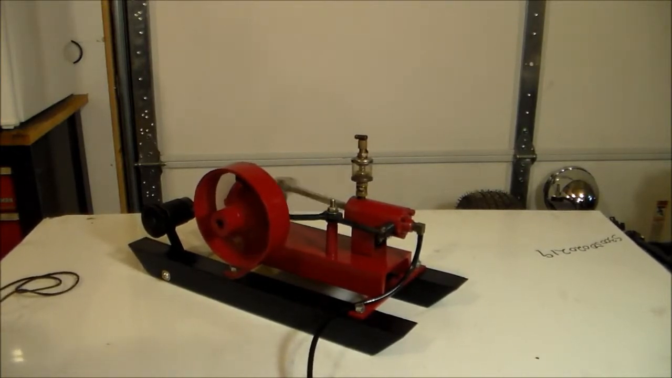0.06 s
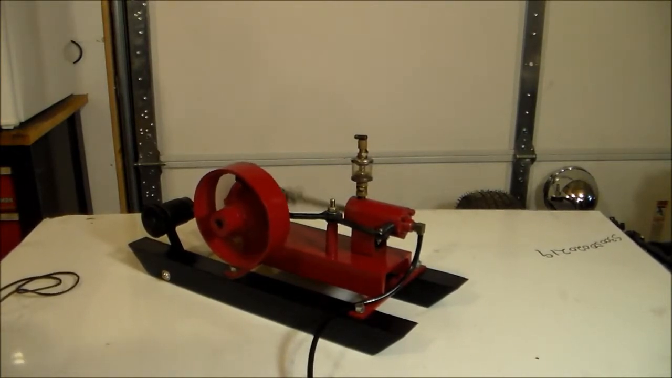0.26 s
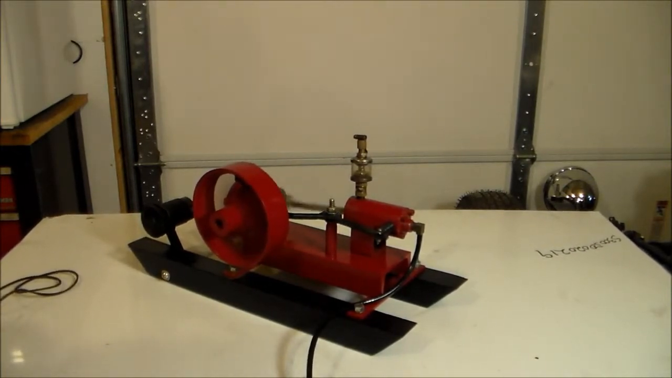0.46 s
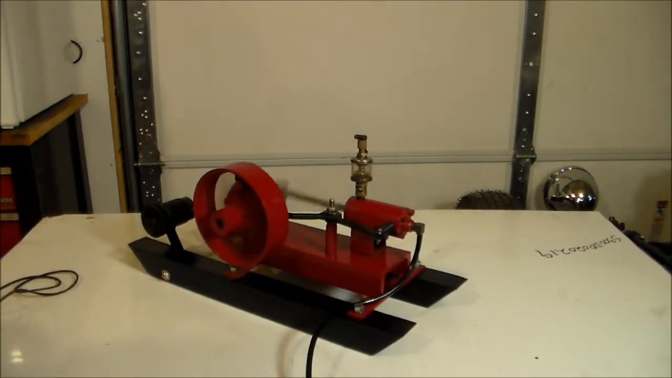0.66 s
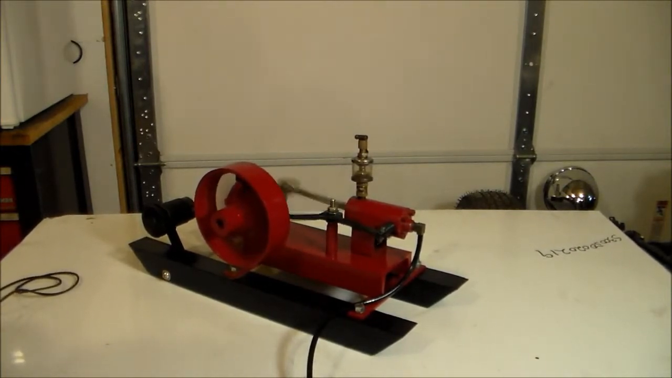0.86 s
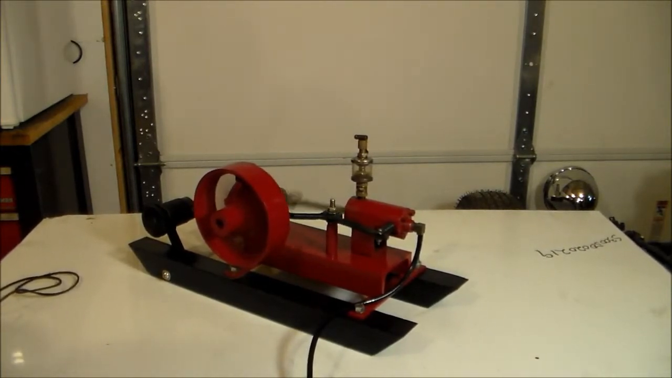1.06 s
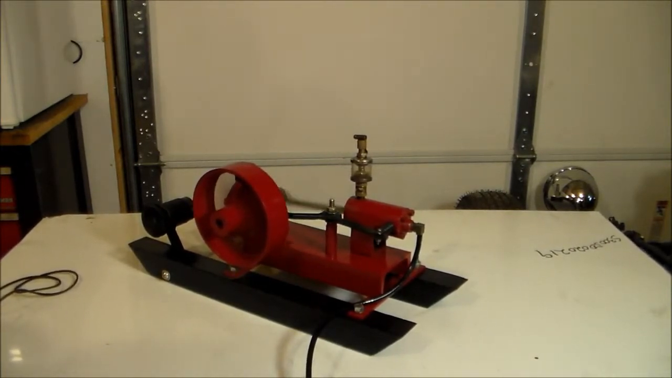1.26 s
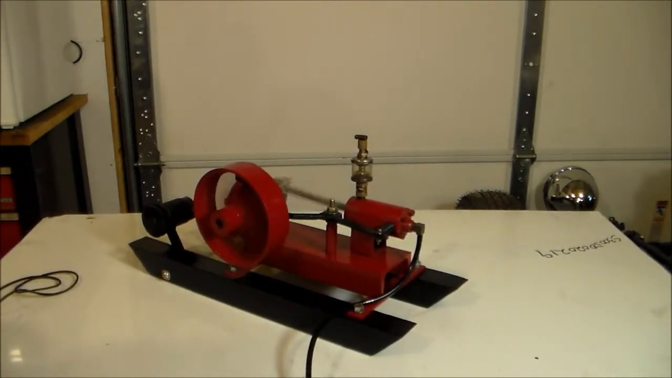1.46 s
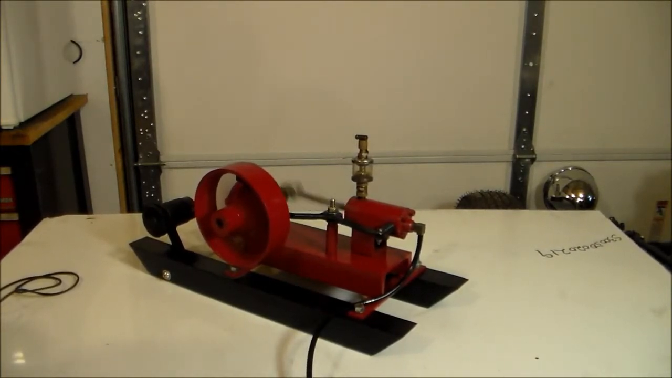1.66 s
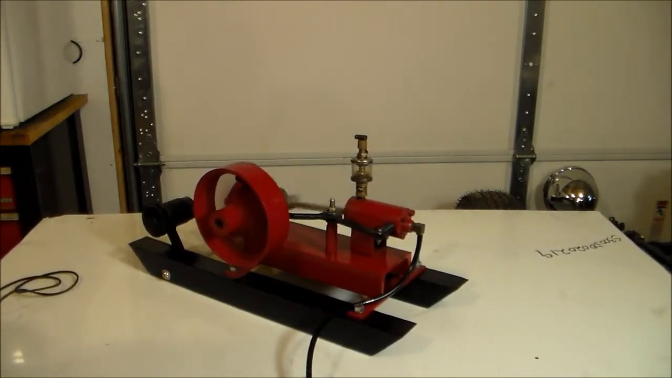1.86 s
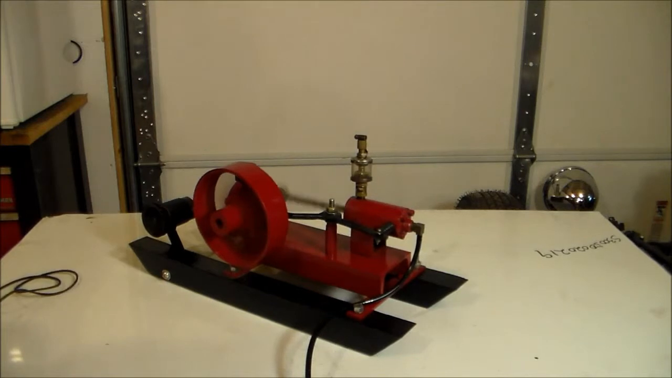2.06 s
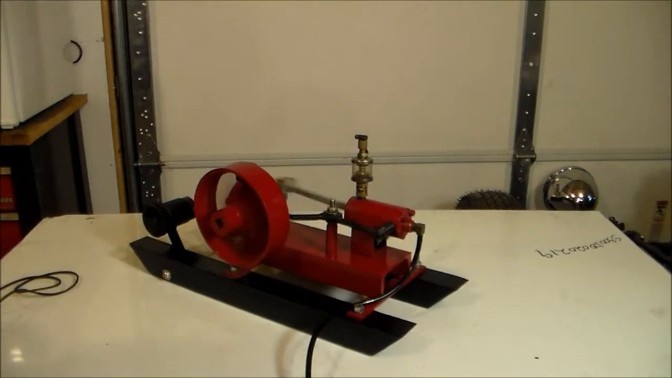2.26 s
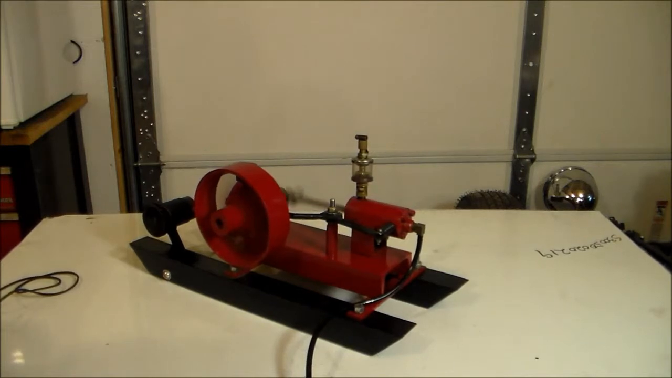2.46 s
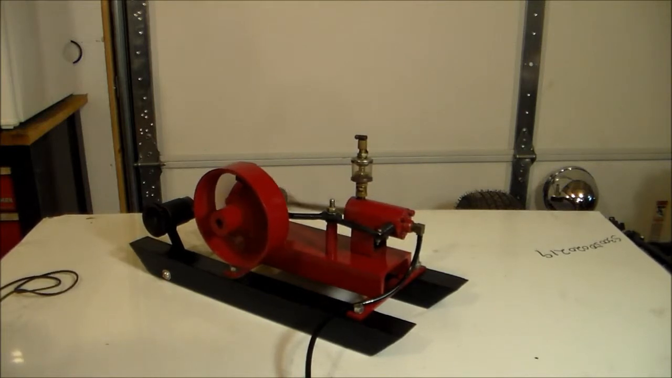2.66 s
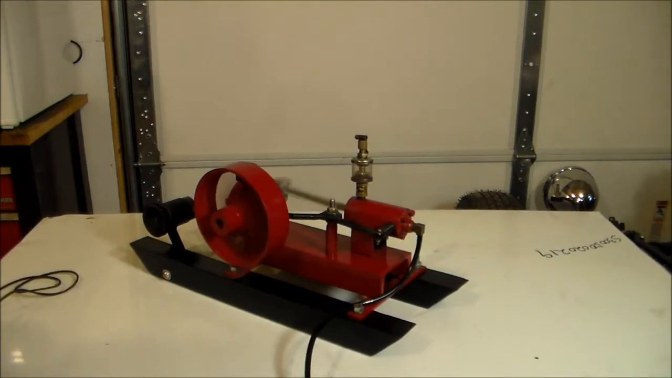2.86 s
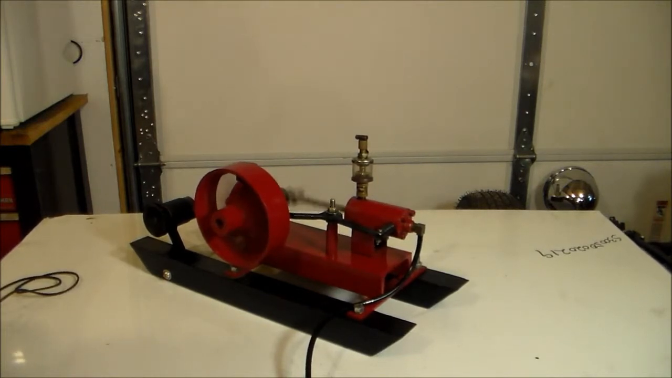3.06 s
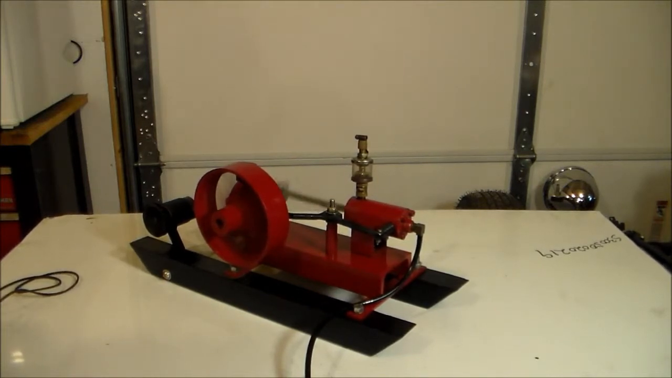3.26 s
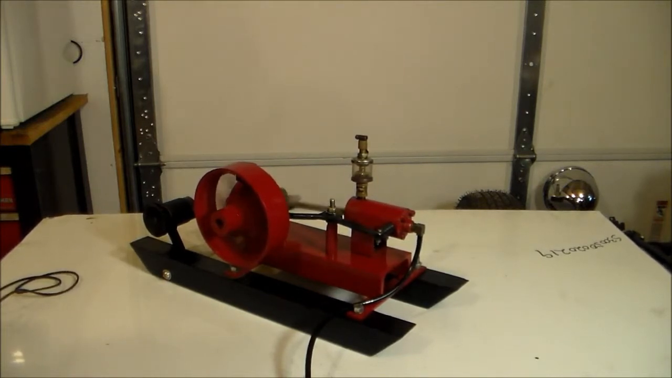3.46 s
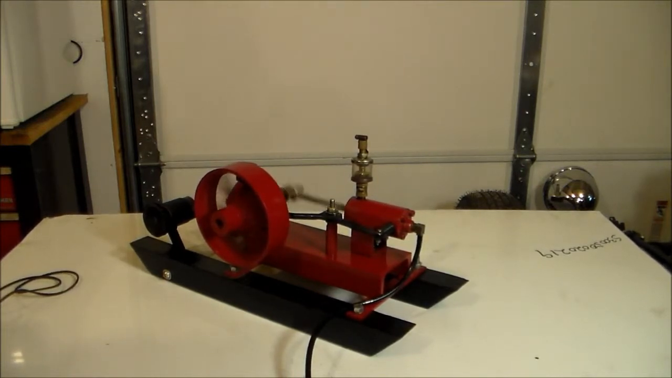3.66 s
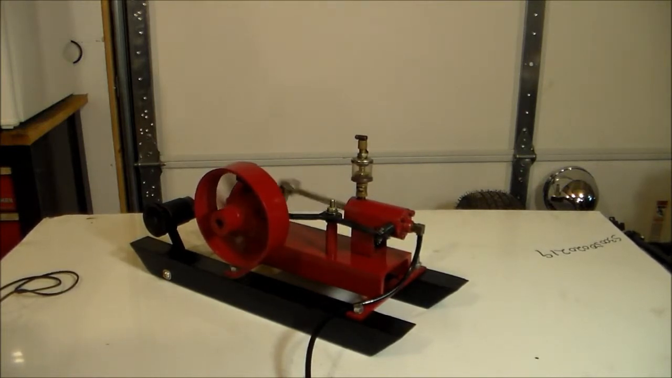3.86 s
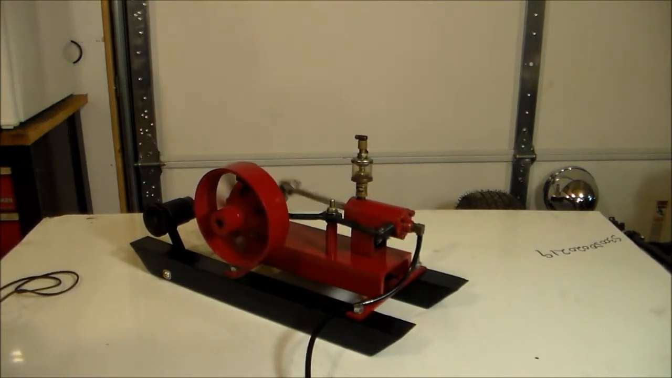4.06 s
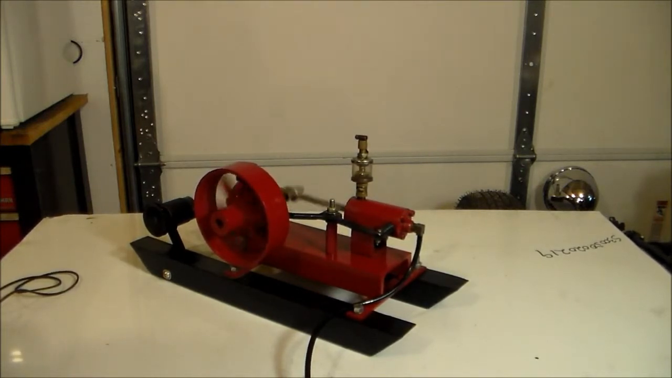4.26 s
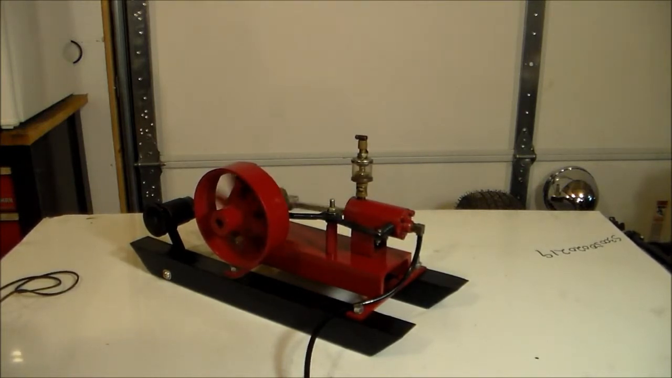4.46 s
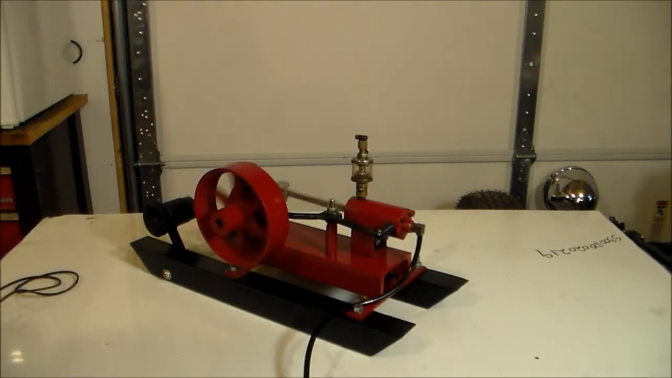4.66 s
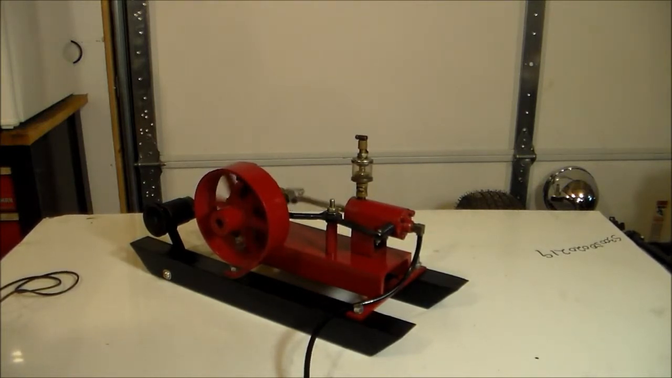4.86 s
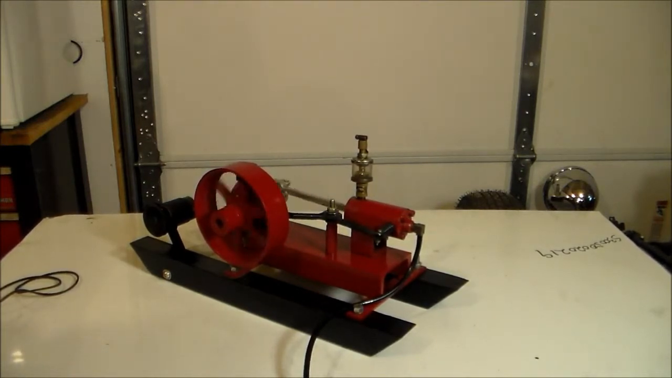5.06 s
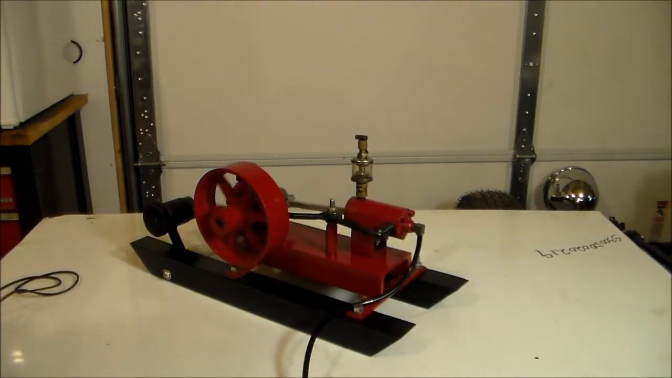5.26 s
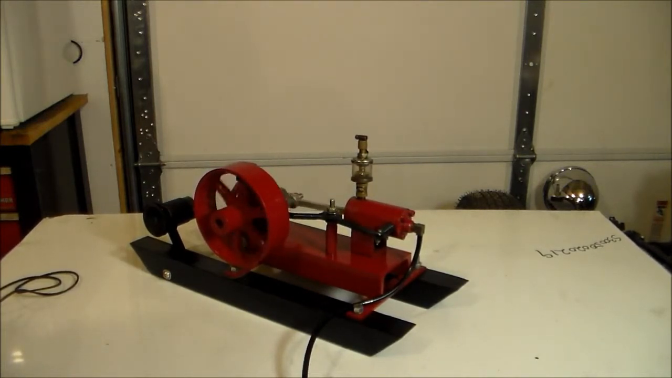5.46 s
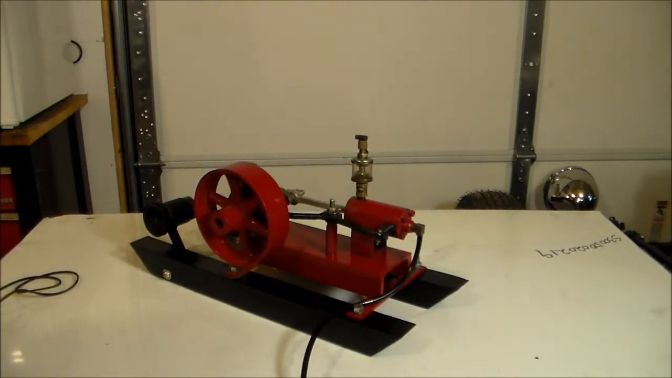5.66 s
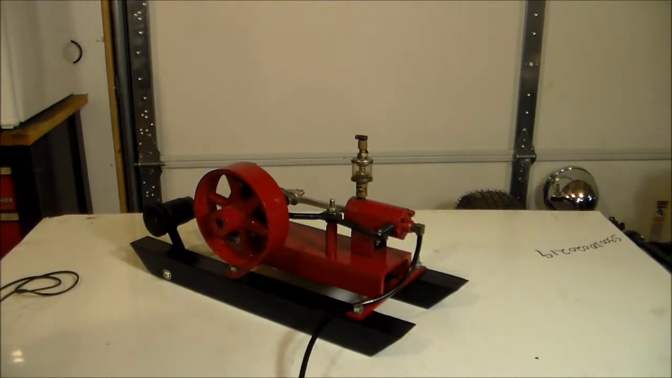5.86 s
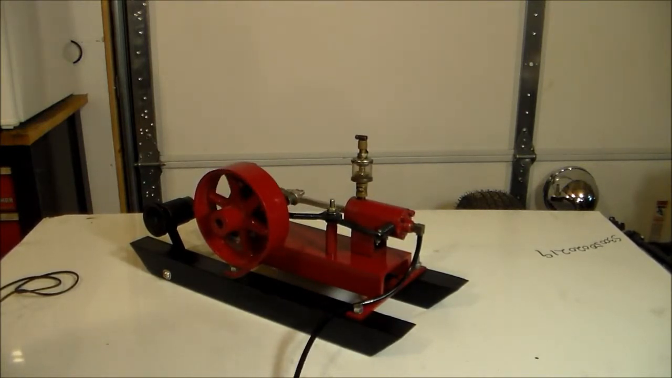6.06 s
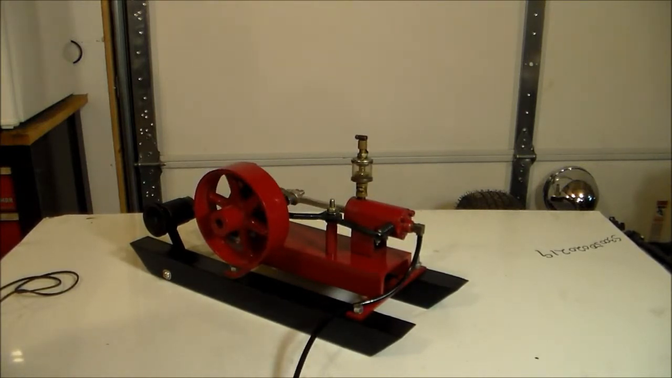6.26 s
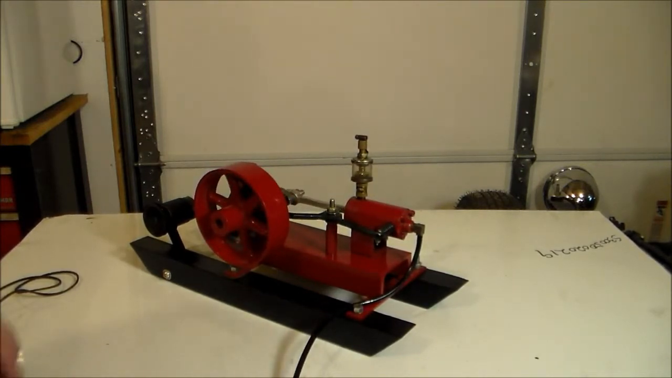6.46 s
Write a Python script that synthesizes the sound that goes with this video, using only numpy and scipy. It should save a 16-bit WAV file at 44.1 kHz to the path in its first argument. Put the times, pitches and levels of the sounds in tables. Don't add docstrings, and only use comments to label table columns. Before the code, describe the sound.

A small air-driven model engine clatters fast and evenly on a hollow bench, then slows knock by knock and stops, followed by faint shuffling.

```python
import sys
import numpy as np
from scipy import signal
from scipy.fft import rfft, irfft, next_fast_len
from scipy.io import wavfile
from scipy.ndimage import uniform_filter1d

SR = 44100
rng = np.random.default_rng(int(sys.argv[2]) if len(sys.argv) > 2 else 0)


def voltage_ratio(decibels):
    exponent = np.asarray(decibels, float) / 20
    return 10 ** exponent


def transcribe(u):
    v = np.clip(np.atleast_2d(u).T, -1, 1)
    q = np.round(v * 32767).astype(np.int16)
    wavfile.write(sys.argv[1], SR, q)


N = 287973
SIZE = next_fast_len(N + SR)
HZ = np.maximum(np.fft.rfftfreq(SIZE, 1 / SR), 1)

# open_s, knock_db, snap_db, rod_ring_db
FAST_TURNS = [(-0.0068, 6, -14.5, -47), (0.1079, -11.5, -15.5, -31), (0.2218, -12, -18, -42),
              (0.337, -13.5, -21, -43), (0.452, -18, -12.5, -43), (0.5681, -18, -11.5, -42),
              (0.6836, -12, -13.5, -38), (0.7989, -18, -13, -38), (0.914, -14, -14.5, -39),
              (1.03, -17, -26, -41), (1.1458, -10.5, -18.5, -27.5), (1.262, -12, -15, -27),
              (1.3774, -18, -11.5, -30), (1.494, -12.5, -16, -30), (1.609, -16, -10.5, -30.5),
              (1.7254, -12, -12.5, -33), (1.8408, -14, -23, -26), (1.958, -13.5, -19, -30.5),
              (2.074, -13, -12.5, -34), (2.1899, -11, -20, -28), (2.3059, -16.5, -10.5, -27),
              (2.4212, -15.5, -13, -43), (2.538, -14.5, -22, -47), (2.6544, -15.5, -15.5, -46),
              (2.7716, -15, -15, -31), (2.8889, -17.5, -13.5, -51), (3.006, -11.5, -13, -36)]
# open_s, knock_db, shut_s, snap_db, rod_ring_db
COASTING_TURNS = [(3.1282, -13, 3.1524, -16.5, -47), (3.257, -14.5, 3.2806, -20, -52),
                  (3.393, -15, 3.418, -19, -42), (3.5337, -11.5, 3.5593, -18, -34),
                  (3.6875, -12, 3.7137, -14, -29), (3.8533, -8.5, 3.8815, -18.5, -30),
                  (4.033, -8, 4.0629, -11.5, -24), (4.2335, -9, 4.2705, -30, -47),
                  (4.4623, -11.5, 4.5013, -12, -29), (4.7354, -9.5, 4.779, -16, -42),
                  (5.0923, -9, 5.1577, -7, -29)]
# start_s, peak_db, thump_re_peak_db, brightness_re_peak_db
LINK_SLACK = [(3.517, -23, -23, -22), (4.0053, -62, 1, -8), (4.204, -24.5, -3, -23), (4.2404, -13, -7, -6),
              (4.427, -24, -3, -32), (4.436, -24, 9.5, -40), (4.468, -19, 8, -1), (4.491, -31, 7, -33),
              (4.557, -20.5, -4, -16), (4.6912, -26, 0, -50), (4.7042, -26, 6.5, -26),
              (4.743, -33.5, 19.5, -7), (4.789, -13.5, -9, -25), (4.8026, -14, -10, -11),
              (4.861, -20.5, -7, -36), (4.913, -32.5, 13.5, -15), (5.034, -27, 6, -51),
              (5.052, -29.5, 5, -27), (5.1059, -19, 2.5, -8), (5.1948, -14, -20, -15),
              (5.299, -31.5, -1, -30), (5.4031, -35, 11, -19)]
# start_s, level_db
WHEEL_HITS = [
    (4.691, -42),
    (4.9104, -46),
    (5.035, -40.5),
    (5.297, -46),
    (5.4019, -46),
]
# time_s, level_db
SUPPLY = [
    (0, -0.5),
    (3.0, 0),
    (3.37, -6),
    (4.05, -9),
    (4.7, -13),
    (5.1, -16.5),
    (5.3, -21),
    (5.44, -49),
    (6.53, -45),
]
# time_s, level_db
MOTION = [
    (0, -0.5),
    (2.5, -6.5),
    (4.05, -1),
    (4.7, -6),
    (5.0, -14),
    (5.3, -11),
    (5.44, -21),
    (5.8, -42),
    (6.53, -39),
]
# mode_hz, level_db, t60_s
FRAME_MODES = [(1300, -5, 0.093), (1420, 2.5, 0.046), (1740, 9, 0.0095), (1930, -10.5, 0.013),
               (2346, -7, 0.18), (2390, -0.5, 0.025), (2518, 4, 0.023), (2683, 12, 0.014),
               (2950, -4.5, 0.06), (3190, -5, 0.036), (3513, 3.5, 0.038), (3655, 8, 0.018),
               (4110, -2, 0.017), (4280, -0.5, 0.051), (4770, -4.5, 0.023), (5455, -1, 0.014),
               (7560, 9, 0.0061), (8240, -6, 0.0084), (10080, 6, 0.0095), (10750, 4.5, .008),
               (11500, -17, .012), (13000, -13, 0.018)]
# mode_hz, level_db, t60_s
BENCH_MODES = [(601, -16, 0.36), (634.5, 0, 0.17), (727.4, 4.5, 0.091), (792, 8.5, 0.054),
               (891, 13.5, 0.035), (969.4, -4, 0.28), (1008, 9.5, 0.078), (1050, -23, 0.032),
               (1172, 5, 0.045)]
# mode_hz, level_db, t60_s
HOLLOW_MODES = [(282, -1, 0.12), (380, -60, 0.011), (418.2, 3.5, 0.11), (460, -12.5, 0.13)]
# mode_hz, level_db, t60_s
BOX_MODES = [(390, -6, .07), (411, 0, .1)]
# mode_hz, level_db, t60_s
ROD_MODES = [(2270, -3, .12), (2298, 0, .2), (2345, -4, .1)]
# mode_hz, level_db, t60_s
WHEEL_MODES = [(1080, -18, 0.22), (1094, 0, 0.28), (1067, 0, 0.14)]
# mode_hz, level_db, t60_s
VALVE_MODES = [(8785, 2, .18), (9815, 2, .07), (9790, -2, .07)]
# mode_hz, level_db, t60_s
PLANK_MODES = [(578, 1, 0.1), (620, -1, .1), (720, -4, .07)]
# mode_hz, level_db, t60_s
PANEL_MODES = [(180.8, 1.5, 0.28), (244.3, -2.5, 0.25), (315.3, 0.5, 0.34)]
BOOM_MODES = [(113.5, 0, 0.18)]
RUB_MODES = [(204, -6.5, 0.32), (315, -4, 0.042), (428, 10.0, 0.017)]
# frequency_hz, density_db
CRACK_SPECTRUM = [(500, -51), (1000, -70), (1500, -17), (2300, -31), (4000, 18.5), (6000, 11.5),
                  (10000, 13.5), (14000, 12.5)]
# frequency_hz, density_db
AIR_SPECTRUM = [(300, -37), (1000, 9), (1800, 5), (2400, 6), (4000, 7.5), (6000, 1), (8000, 1.5),
                (10000, 1), (12000, 2.5), (14000, -6)]
# frequency_hz, density_db
HISS_SPECTRUM = [(1000, 9.5), (3000, 9.5), (5000, 5.5), (7000, 2.5), (9000, -0.5), (11000, 5.5),
                 (14000, 0.5)]
# frequency_hz, density_db
FLOOR_SPECTRUM = [(53, -42), (90, -4), (225, -3.5), (336, -15), (443, -9.5), (1080, -11), (2090, -16.5),
                  (2700, -16.5), (3010, -16), (13300, -25.5), (14500, -16.5)]
# start_s, hold_s, low_shuffle_db, cloth_db, thin_swish_db
MOVES = [
    (4.597, 0.036, -59.5, -80, -85),
    (4.794, 0.11, -52.5, -80, -85),
    (5.726, 0.18, -68, -62.5, -65.5),
    (6.064, 0.034, -55, -58, -73),
    (6.17, .11, -60, -63.5, -80),
    (6.52, .03, -67, -76, -80),
]
# time_s, level_db
DRAUGHT = [
    (0, -66),
    (3.6, -68),
    (3.9, -58),
    (6.53, -54),
]
# frequency_hz, t60_s
ROOM_T60 = [(150, 0.24), (1000, 1), (4000, 0.52), (12000, 0.36)]
# frequency_hz, left_minus_right_db
LEAN = [(60, 1.5), (100, 0), (3700, 0), (5900, 2.5), (9400, 2.5), (14900, .5)]
# frequency_hz, side_minus_mid_db
ENGINE_APART = [(60, -8), (100, -16), (180, -39), (310, -29.5), (540, -24), (950, -26.5), (1640, -28.5),
                (2850, -22.5), (4940, -4), (8580, -3.5), (14900, -4)]
# frequency_hz, side_minus_mid_db
SHOP_APART = [(60, -7), (150, -7), (380, -8), (950, -5.5), (2370, -5), (5940, -1), (14900, 5)]

OPEN_S = 0.0218
EDGE_FOLLOWS = 0.086
SLACK_CUT_HZ = 4700
COLOUR_SPREAD_DB = 4.0
FRAME_LOW_HZ = 1050
JET_DB, JET_DIES_DB = -29, -7.5
JET_LOSS = 2.5
COAST_THUD_DB = 11
DEAD_SNAP_DB = -30
SHAKE_LAG_S, SHAKE_RISE_S, SHAKE_DECAY_S = 0.035, 0.045, 0.03
MOVE_ATTACK_S, MOVE_RELEASE_S = 0.048, 0.062
HISS_DB, FLOOR_DB = -39.5, -58
WHINE_HZ, WHINE_DB = 2770, -70.5
CUTOFF_HZ = 14240


def knocks():
    edge = soft = frame = 0
    parts = 3
    decay = 0.0032
    contact = grit(spread_db=1.5, per_s=25000)
    top = 1 / (1 + (5500 / HZ) ** 4)
    crack = voltage_ratio(-5.0) * colour(CRACK_SPECTRUM)
    dull = 1 / (1 + (HZ / SLACK_CUT_HZ) ** 6)
    for (s, body_db, edge_db, thump_db, rise), reach in zip(blows(), (1, 1, dull)):
        mix = COLOUR_SPREAD_DB * rng.standard_normal((len(s), parts))
        mix = mix - 10 * np.log10(np.mean(voltage_ratio(2 * mix), axis=1, keepdims=True))
        for k in range(parts):
            metal = crack / parts + voltage_ratio(-14.0) * modes(FRAME_MODES[k::parts])
            hit = bursts(s, body_db + mix[:, k], rise, decay) * contact
            frame = frame + through(hit, metal * (1 - top) * reach)
        edge = edge + bursts(s, edge_db, rise, 0.91 * decay)
        soft = soft + bursts(s + 0.0029, thump_db, 0.35 * rise, 4.1 * decay)
    bright = through(edge * contact, (crack + voltage_ratio(-5) * modes(FRAME_MODES)) * top)
    thump = through(soft * contact, modes(BENCH_MODES))
    return band(frame, FRAME_LOW_HZ, 14000) + voltage_ratio(7.0) * bright + voltage_ratio(-17.5) * thump


def rings():
    (opened, _, knock_edge, *_), (shut, _, snap_edge, *_), _ = blows()
    slower = turns()[-1]
    chance = rng.standard_normal((len(opened), 2))
    coasting = opened > COASTING_TURNS[0][0] - 0.05
    thud_db = law(-48.5, 1.5, slower) + COAST_THUD_DB * coasting
    thud = voltage_ratio(7) * struck(opened + 0.004, thud_db, BOX_MODES, soft=0.003)
    plank = struck(opened + 0.018, law(-50.5, 13.5, slower), PLANK_MODES, soft=0.0018)
    rod_db = np.array([turn[-1] for turn in FAST_TURNS + COASTING_TURNS])
    rod = voltage_ratio(-2.5) * struck(opened, rod_db, ROD_MODES, soft=0.0002)
    head = voltage_ratio(-27.0) * struck(shut, snap_edge + 3 * chance[:, 0], VALVE_MODES, soft=0)
    head += voltage_ratio(-18.5) * struck(opened, knock_edge + 4.2 * chance[:, 1], VALVE_MODES[1:], soft=0)
    hit_s, hit_db = np.transpose(WHEEL_HITS)
    wheel = voltage_ratio(-0.5) * struck(hit_s, hit_db, WHEEL_MODES, soft=0.00036)
    return thud + plank + rod + head + wheel


def open_valve():
    t, held = np.arange(N) / SR, np.zeros(N)
    opened, _, shut, _, slower = turns()
    short = np.minimum(np.interp(opened, *np.transpose(SUPPLY)) - JET_DIES_DB, 0)
    for start, end, db in zip(opened, shut, JET_DB + JET_LOSS * short):
        a, b = max(int(start * SR), 0), int(end * SR)
        held[a:b] = voltage_ratio(db + 3.6 * (t[a:b] - end) / (end - start))
    rattle_db = law(-30.5, 7, slower[:-1])
    after = bursts(shut[:-1] + 0.0035, rattle_db, rise=0.00063, decay=0.016)
    shake = uniform_filter1d(held, size=60) + after
    links = shake * grit(spread_db=2.0, per_s=10000) * wobble(200, 3.0)
    jet = shake * grit(spread_db=1.5, per_s=16000) * wobble(250, 2.5)
    top = 1 / (1 + (3000 / HZ) ** 4)
    body = colour(AIR_SPECTRUM) + voltage_ratio(-10) * modes(FRAME_MODES) + voltage_ratio(-13) * modes(BENCH_MODES)
    return through(links, body * np.sqrt(1 - top)) + through(jet, body * np.sqrt(top))


def running():
    motion, pressure = in_time(MOTION)[0], in_time(SUPPLY)[0]
    drum = through(grit(spread_db=0.0, per_s=1500), modes(BENCH_MODES) + modes(HOLLOW_MODES))
    bearings = shaken(-53.5, 0.8, shake_db=-50.5, per_halving_db=8.5) * rms_one(band(drum, 230, 940))
    body = modes(FRAME_MODES) + voltage_ratio(2.5) * modes(BENCH_MODES) + voltage_ratio(-9) * modes(ROD_MODES)
    link = rms_one(band(through(grit(spread_db=3.0, per_s=2500), body), 550, 4500))
    buzz = voltage_ratio(law(-44, 0.97, motion) + np.minimum(pressure + 21, 0)) * link
    rod = through(grit(spread_db=3.0, per_s=250), modes(ROD_MODES))
    rod = voltage_ratio(law(-50.5, 0.9, motion) + 1.2 * pressure) * rod
    leak = colour(HISS_SPECTRUM) + voltage_ratio(-16) * modes(VALVE_MODES)
    hiss = through(rng.standard_normal((2, N)), leak) * wobble(12.5, 1.5)
    return bearings + buzz + rod + voltage_ratio(HISS_DB + pressure) * hiss


def drones():
    panel = rms_one(through(rng.standard_normal((2, N)), modes(PANEL_MODES)))
    boom = rms_one(through(rng.standard_normal((2, N)), modes(BOOM_MODES)))
    panel = shaken(-55.5, 1, shake_db=-51, per_halving_db=3.5) * panel
    boom = (shaken(-63.5, 0.19, shake_db=-66, per_halving_db=5) + gestures(column=2)) * boom
    return band(panel + boom, 80, 344)


def nearby():
    rub = through(rng.standard_normal((2, N)), modes(RUB_MODES))
    shuffle = rms_one(band(rub, 91, 840)) * gestures(column=2)
    fibres = band(grit(spread_db=0.5, per_s=6700), 470, 4600)
    cloth = rms_one(band(fibres, 510, 4100)) * gestures(column=3)
    thin = band(rng.standard_normal((2, N)), 6500, 14000)
    swish = rms_one(band(thin, 6500, 14000)) * gestures(column=4)
    low_air = band(rng.standard_normal((2, N)), 12.5, 40)
    air = rms_one(band(low_air, 12, 59)) * voltage_ratio(in_time(DRAUGHT)[0])
    wander = np.cumsum(band(rng.standard_normal(N), 1.5, 30)) * 0.01
    whine = voltage_ratio(WHINE_DB) * np.sin(2 * np.pi * WHINE_HZ * np.arange(N) / SR + wander)
    floor = voltage_ratio(FLOOR_DB) * rms_one(through(rng.standard_normal((2, N)), colour(FLOOR_SPECTRUM)))
    return shuffle + cloth + swish + air + whine + floor


def workshop(x):
    t, edges = np.arange(SR // 2) / SR, 90 * 2. ** np.arange(8)
    white = rng.standard_normal((2, len(t)))
    tail = 0
    for hz in edges:
        tail = tail + band(white, hz, min(2 * hz, 19000)) * voltage_ratio(-60 * t / at_hz(ROOM_T60, 4.9 * hz))
    tail = tail * np.clip((t - 0.004) / 0.0013, 0, 1)
    return through(x, rfft(tail / np.sqrt(np.sum(tail[0] ** 2)), SIZE))


def microphones(near, diffuse, shop):
    mid = near[0] + diffuse[0] + shop[0]
    engine_side = through(voltage_ratio(-4.0) * near[1] + voltage_ratio(2.5) * diffuse[1], voltage_ratio(at_hz(ENGINE_APART)))
    side = engine_side + through(shop[1], voltage_ratio(at_hz(SHOP_APART)))
    lean = voltage_ratio(at_hz(LEAN) / 2)
    return through(np.array([mid + side, mid - side]), np.array([lean, 1 / lean]))


def turns():
    opened, knock, snap, _ = np.transpose(FAST_TURNS)
    late = np.transpose(COASTING_TURNS)
    shut = np.r_[opened + OPEN_S, late[2]]
    opened = np.r_[opened, late[0]]
    slower = np.log2((shut - opened) / OPEN_S)
    return opened, np.r_[knock, late[1]], shut, np.r_[snap, late[3]], slower


def blows():
    opened, knock, shut, snap, slower = turns()
    s, db, thump, bright = np.transpose(LINK_SLACK)
    knock_edge = law(-20, -6, slower) + EDGE_FOLLOWS * (knock - knock.mean())
    knock_rise = 0.00097 * 2 ** (0.66 * slower)
    snap_edge = law(-18, -7, slower ** 2) + EDGE_FOLLOWS * (snap - snap.mean())
    snap_thump = law(-14.5, 0.6, slower) + DEAD_SNAP_DB * (shut == shut[-1])
    return ((opened, knock, knock_edge, law(-46, 17, slower), knock_rise),
            (shut, snap, snap_edge, snap_thump, 0.0011),
            (s, db, db + bright, db + thump, 0.00085))


def law(base_db, slope_db, control):
    return base_db + slope_db * control


def shaken(steady_db, swing, shake_db, per_halving_db):
    opened, *_, slower = turns()
    steady = voltage_ratio(law(steady_db, swing, in_time(MOTION)[0]))
    jolt_db = law(shake_db, per_halving_db, slower)
    return steady + bursts(opened + SHAKE_LAG_S, jolt_db, SHAKE_RISE_S, SHAKE_DECAY_S)


def struck(times, level_db, table, soft):
    push = np.zeros(N)
    inside = times > 0
    push[(times[inside] * SR).astype(int)] = voltage_ratio(level_db[inside]) * np.sqrt(0.01 * SR)
    return through(push, modes(table) / (1 + 1j * HZ * soft))


def gestures(column):
    t, out = np.arange(N) / SR, 0
    for row in MOVES:
        attack = np.minimum((t - row[0]) / MOVE_ATTACK_S, 0)
        release = np.minimum((row[0] + row[1] - t) / MOVE_RELEASE_S, 0)
        out = out + voltage_ratio(row[column]) * np.exp(attack + release)
    return out


def bursts(times, level_db, rise, decay):
    out = np.zeros(N)
    for s, db, up in np.broadcast(times, level_db, rise):
        i = np.arange(max(int((s - 8 * up) * SR), 0), min(int((s + 8 * decay) * SR), N))
        since = i / SR - s
        out[i] += voltage_ratio(db) * np.exp(np.where(since < 0, since / up, -since / decay))
    return out


def grit(spread_db, per_s):
    sizes = voltage_ratio(spread_db * np.minimum(rng.exponential(1, N), 4)) * (rng.random(N) < per_s / SR)
    return rms_one(sizes * rng.standard_normal((2, N)))


def wobble(rate_hz, depth_db):
    return voltage_ratio(depth_db * rms_one(band(rng.standard_normal(N), rate_hz / 4, rate_hz)))


def modes(table):
    t = np.arange(SR // 2) / SR
    ring = sum(voltage_ratio(db - 60 * t / t60) * np.sin(2 * np.pi * hz * t) for hz, db, t60 in table)
    return rfft(ring / np.sqrt(np.sum(ring ** 2)), SIZE)


def colour(points):
    return rms_one(voltage_ratio(at_hz(points)))


def at_hz(points, hz=HZ):
    points = np.array(points)
    return np.interp(np.log(hz), np.log(np.maximum(points[:, 0], 1)), points[:, 1])


def in_time(rows):
    s, *columns = np.transpose(rows)
    return [np.interp(np.arange(N) / SR, s, c) for c in columns]


def through(x, response):
    return irfft(rfft(x, SIZE) * response, SIZE)[..., :N]


def band(x, lo_hz, hi_hz):
    return signal.sosfilt(signal.butter(2, [lo_hz, hi_hz], "band", fs=SR, output="sos"), x)


def rms_one(x):
    return x / np.sqrt(np.mean(x ** 2) + 1e-20)


def scene():
    clatter = band(knocks() + rings() + open_valve(), 210, 18800)
    diffuse = voltage_ratio(-10.0) * workshop(clatter) + running() + drones()
    return microphones(clatter, diffuse, nearby())


def top_cut(x):
    return signal.sosfilt(signal.butter(12, 15490, fs=SR, output="sos"), x)


def record(dry):
    rounded = 0.38 * np.tanh(dry / 0.38)
    cut = through(rounded, 1 / (1 + (HZ / CUTOFF_HZ) ** 300) + voltage_ratio(-62))
    return top_cut(cut)


dry = scene()
out = record(dry)
transcribe(out)
```